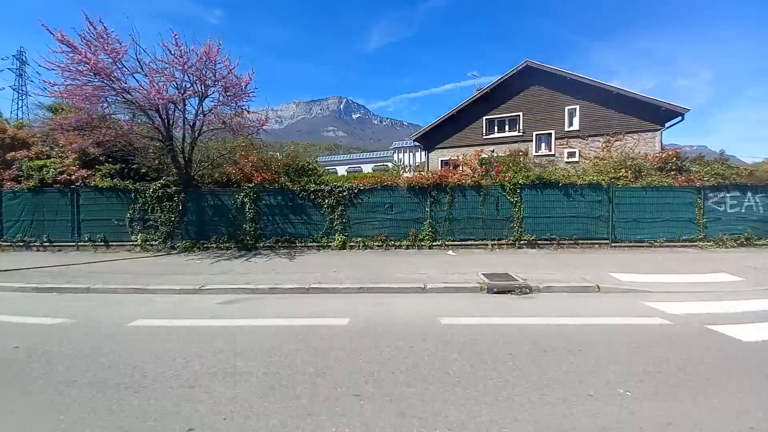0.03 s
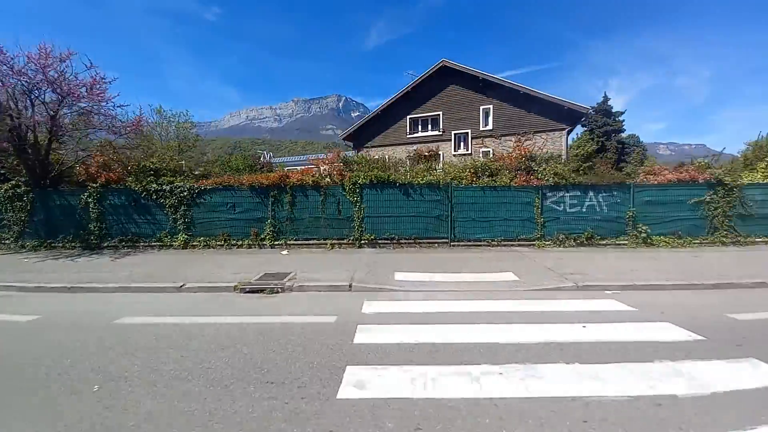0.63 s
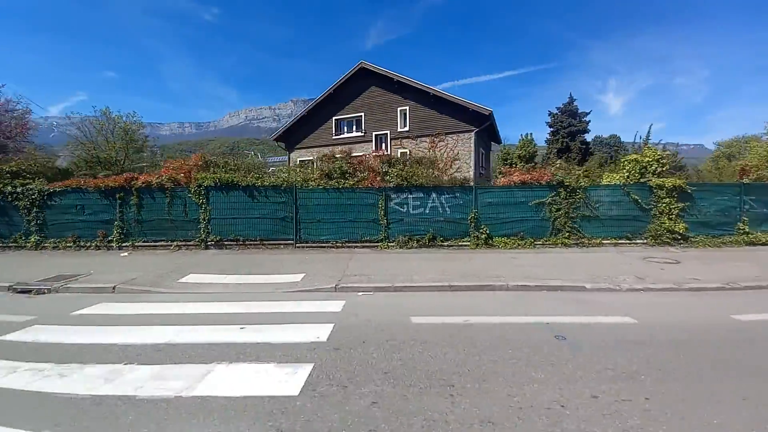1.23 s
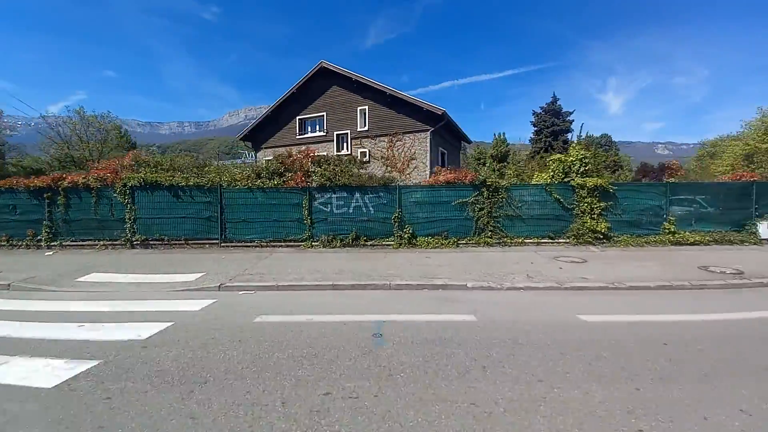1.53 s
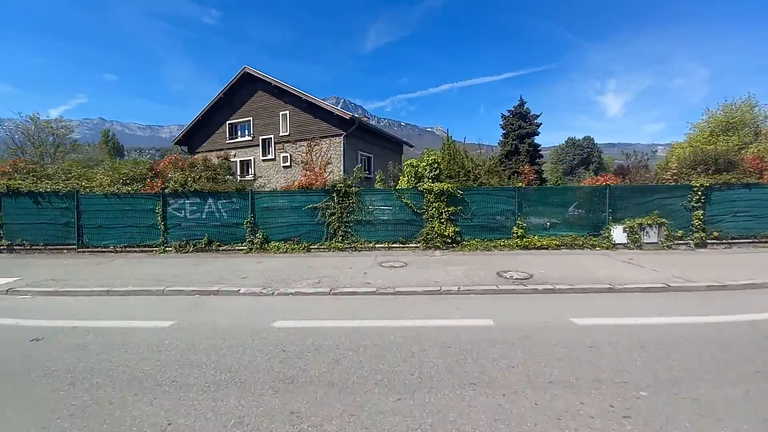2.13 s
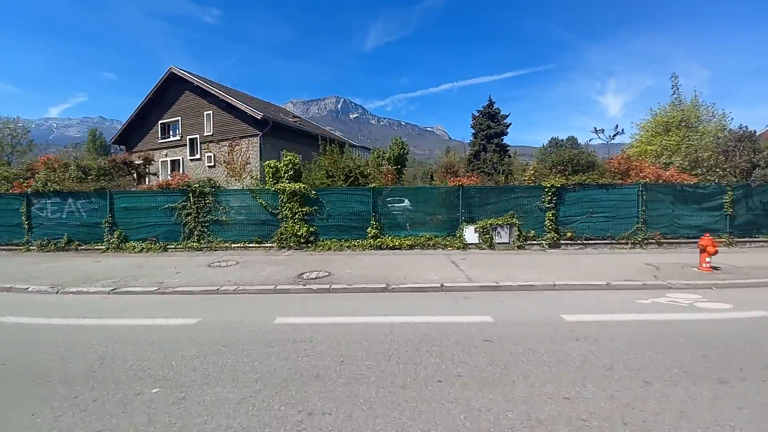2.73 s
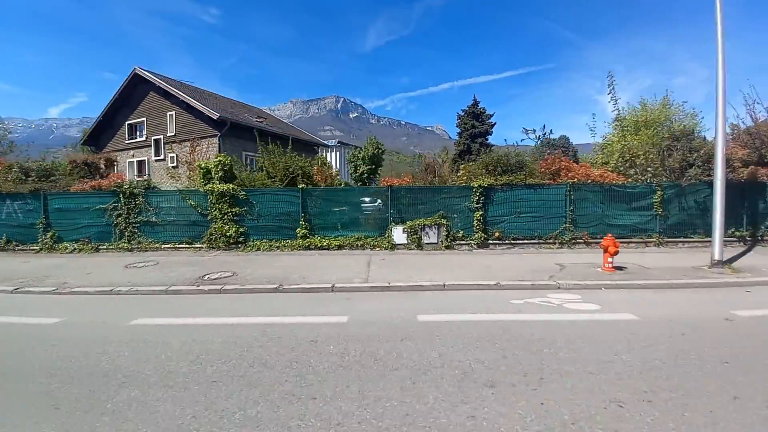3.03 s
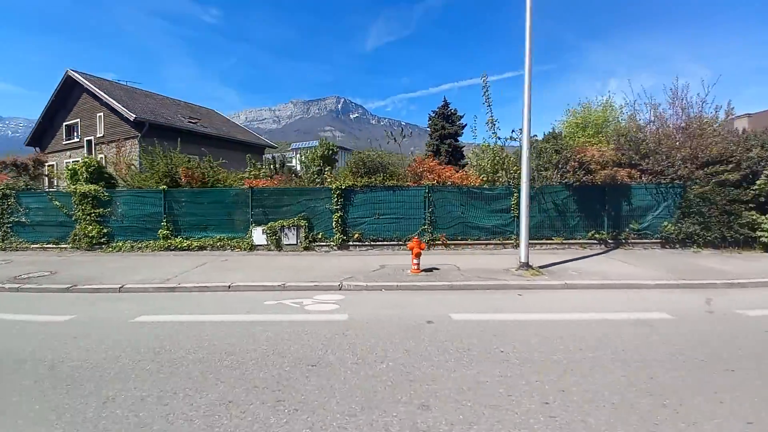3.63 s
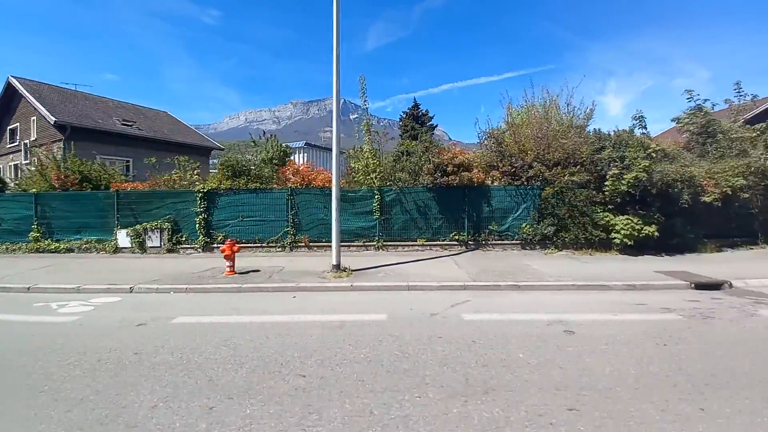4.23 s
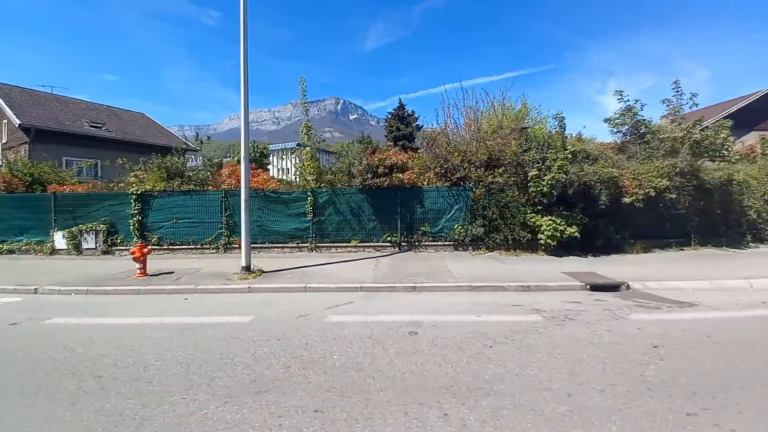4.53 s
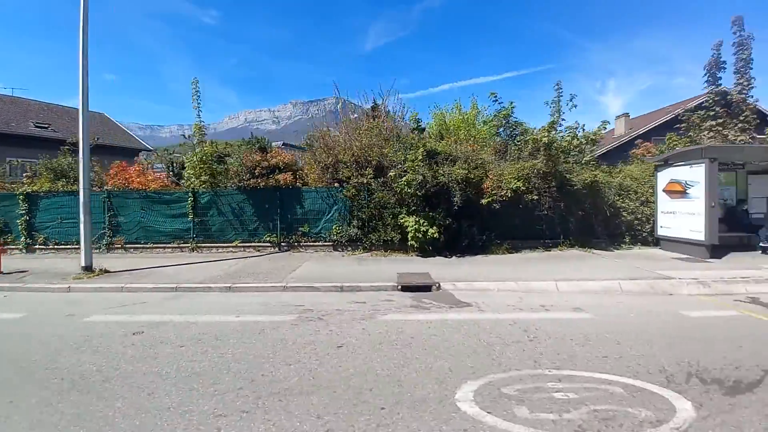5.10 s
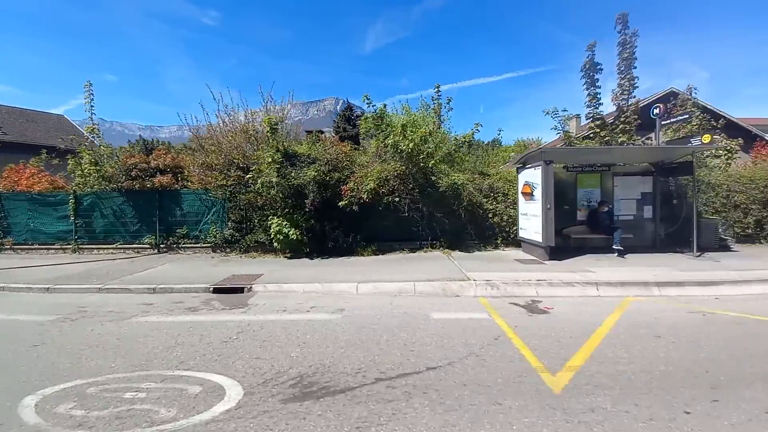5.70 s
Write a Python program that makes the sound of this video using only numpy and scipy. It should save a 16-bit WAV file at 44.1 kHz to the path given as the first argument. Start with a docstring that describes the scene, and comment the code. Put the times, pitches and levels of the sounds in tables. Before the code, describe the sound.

A bus rolls along, heard from inside: booming cabin, road noise and a soft whine, with bumps shaking loose fittings.

```python
"""Inside a rolling city bus. From the start the cabin booms, tyres roar, gears whine, a fan hums thinly
and plastic trim buzzes. Near 0.5 s, and harder near 1.4 s, rough road thumps the suspension and shakes
loose fittings; small parts tick and panels knock. More bumps follow after 3 s while the whine sinks with
the slowing bus. From about 4.3 to 4.9 s a brake pad sings on its disc. After 5.3 s the bus picks up
speed and the whine rises again."""
import sys
import numpy as np
from scipy import signal
from scipy.fft import rfft, irfft, next_fast_len
from scipy.io import wavfile
from scipy.ndimage import map_coordinates

SR = 44100
rng = np.random.default_rng(int(sys.argv[2]) if len(sys.argv) > 2 else 0)


def to_wav(sig):
    """Store sig (one row per channel, or 1-D mono) as 16-bit WAV at the path in sys.argv[1].

    Samples outside -1..1 are clipped; the rate is SR.
    """
    pcm = np.clip(np.atleast_2d(sig), -1, 1) * 32767
    pcm = np.round(pcm).astype(np.int16)
    wavfile.write(sys.argv[1], SR, pcm.T)  # frames by channels


N = 258426
BURST = SR // 2  # samples in one short, struck sound


def amp(db):
    """Turn decibels into a number to multiply by."""
    return 10 ** (np.asarray(db) / 20)


def unit(x):
    """Scale a signal to an average power of 1."""
    return x / np.sqrt(np.mean(x ** 2) + 1e-20)


def along(points, hz):
    """Read between (frequency, value) points, with octaves about evenly spaced."""
    f, values = np.transpose(points)
    return np.interp(np.log(hz + 1), np.log(f + 1), values)


def curves(rows):
    """Turn each column after the time into one value per sample."""
    times, *columns = np.transpose(rows)
    return [np.interp(np.arange(N) / SR, times, column) for column in columns]


def wobble(rate):
    """A smooth random curve through `rate` points a second."""
    return map_coordinates(rng.standard_normal(int(N * rate / SR) + 4), [np.arange(N) * rate / SR])


def filtered(x, response):
    """Multiply each frequency in x by response(frequency)."""
    n = x.shape[-1]
    padded = next_fast_len(n + 8192)
    return irfft(rfft(x, padded) * response(np.fft.rfftfreq(padded, 1 / SR)), padded)[..., :n]


def colour(spectrum, hz):
    """How strong each frequency is; it falls steeply above the last point."""
    return amp(along(spectrum, hz)) / (1 + (hz / (2 * spectrum[-1][0])) ** 4)


def steady(x, span_s):
    """Even out swells slower than span_s."""
    power = signal.fftconvolve(np.mean(x ** 2, axis=0), signal.windows.hann(int(span_s * SR)), "same")
    return unit(x / np.sqrt(np.abs(power) + 1e-9))


def place(start, burst):
    """Put a short stereo sound into silence at `start` seconds."""
    out = np.zeros((2, N + BURST))
    out[:, round(start * SR):][:, :BURST] = burst
    return out[:, :N]


# How alike left and right sound in the cabin: f/Hz, likeness (1 = the same)
LIKENESS = [(60, 0.99), (130, 1), (290, 0.87), (640, 0.65), (1400, 0.19), (3000, 0.027), (12000, 0.04)]
def rush(spectrum, size=N, lag_s=.00046):
    """Stereo cabin noise of power 1; the treble reaches the right side first."""
    spread = lambda hz: np.arccos(np.clip(along(LIKENESS, hz), -1, 1)) / 2
    shape = lambda hz: colour(spectrum, hz) * [np.cos(spread(hz)), np.sin(spread(hz))]
    mid, side = filtered(rng.standard_normal((2, size)), shape)
    lag = lambda hz: np.exp(np.pi * 1j * hz * lag_s * hz / (hz + 300) * np.array([[-1], [1]]))
    return unit(filtered(np.array([mid + side, mid - side]), lag))


def tone(hz, waver, flicker_db=3.5):
    """A wavering note; the cabin's standing waves make it drift differently on each side."""
    phase = 2 * np.pi * np.cumsum(hz * (1 + waver * wobble(40))) / SR
    sides = [amp(flicker_db * wobble(9)) * np.sin(phase + .61 * wobble(5.4)) for _ in range(2)]
    return unit(np.array(sides))


def jolt(start, length, rise_s=.018, release_s=.025):
    """The strength of one bump: it rises, holds while the wheel crosses, then dies away."""
    t = np.arange(N) / SR - start
    return np.clip(1 + t / rise_s, 0, 1) * np.exp(-np.maximum(t - length, 0) / release_s)


# Wheels meet bumps: t/s, boom level/dB, thud level/dB, length/s
BUMPS = [(0, -17.5, -37, 0.012), (0.407, -16.5, -47.5, 0.078), (0.521, -19.5, -29, .05),
         (0.673, -15, -36, 0.1), (0.8, -21.5, -35, .08), (1.306, -12, -29, 0.04), (1.371, -22, -31, .045),
         (1.513, -23, -31, 0.059), (1.625, -13, -39, 0.055), (1.835, -15.5, -50, 0.064),
         (2.081, -16.5, -49, .035), (3.132, -15, -52, 0.062), (3.273, -17.5, -46, 0.034),
         (3.409, -17, -35.5, 0.059), (3.615, -14, -47, .035), (4.666, -13, -45, 0.037),
         (4.996, -20, -49, .03), (5.478, -15.5, -42, .025)]
# The boom between bumps: t/s, level/dB
BOOM_LEVELS = [(0, -20), (.35, -25.5), (.6, -18.5), (1.1, -20.5), (2.0, -20.5), (2.9, -22), (3.3, -20),
               (4.1, -19.5), (5.3, -18), (5.86, -23)]
# How rough the road is: t/s, roughness/dB
ROUGHNESS = [(0, -1.5), (.6, 5.5), (1.1, -3), (1.5, 6.5), (2.2, -7), (3.15, -4), (3.4, 4), (3.9, 0.5),
             (5.86, -3.5)]
# Tone colours of the cabin air, the suspension and the panels: f/Hz, level/dB
BOOM_COLOUR = [(30, -63), (50, -27.5), (62, -19), (72, -4), (81, 0), (92, -0.5), (105, -18), (125, -31),
               (200, -65)]
THUD_COLOUR = [(12, -24), (25, -20), (50, 3), (65, -2.5), (100, -41.5)]
SHUDDER_COLOUR = [(85, -26.5), (112, 0), (140, 3), (155, -3), (175, -4), (200, -7.5), (300, -44.5)]
def body():
    """The road makes the cabin air boom; bumps add a deep thud and shake the panels."""
    rough_db, = curves(ROUGHNESS)
    boom_db, = curves(BOOM_LEVELS)
    bump_boom = sum(amp(db) * jolt(start, length) for start, db, _, length in BUMPS)
    bump_thud = sum(amp(db) * jolt(start, length) for start, _, db, length in BUMPS)
    # hypot adds the power of the bumps to that of plain rolling
    boom = np.hypot(amp(boom_db + 2.5 * wobble(16)), bump_boom)
    thud = np.hypot(amp(-44.5 + .82 * rough_db), bump_thud)
    shudder = np.hypot(amp(-28 + .3 * rough_db), amp(8.5) * bump_thud)
    return (boom * steady(rush(BOOM_COLOUR), span_s=.16)
            + thud * steady(rush(THUD_COLOUR), span_s=.33)
            + shudder * steady(rush(SHUDDER_COLOUR), span_s=.25))


# Rolling noise before its boost: t/s, roar level/dB, hiss level/dB
TYRE_LEVELS = [(0.0, -28.5, -52), (1.31, -29, -54), (1.47, -28.5, -49), (1.99, -30.5, -55.5),
               (5.01, -28, -53), (5.53, -29, -53.5), (5.86, -28, -52.5)]
# Tone colours of the roar and the hiss: f/Hz, level/dB
ROAR_COLOUR = [(115, -27), (190, -7), (218, 0), (255, -3), (305, -3), (350, -9), (500, -8.5), (590, -13.5),
               (850, -15.5), (1500, -21.5), (1780, -26.5), (2350, -27), (3000, -39), (5000, -65.5)]
HISS_COLOUR = [(1200, -20), (2800, 2.5), (4000, 2.5), (6800, -5.5), (7400, -17.5), (11300, -18),
               (12000, -25), (16000, -34)]
def tyres(roar_boost_db=1.02, hiss_boost_db=2.5):
    """Tyres roar through the floor while air and tread hiss."""
    roar_db, hiss_db = curves(TYRE_LEVELS)
    roar = amp(roar_db + roar_boost_db + .56 * wobble(12)) * rush(ROAR_COLOUR)
    hiss = amp(hiss_db + hiss_boost_db + .55 * wobble(31)) * rush(HISS_COLOUR)
    return roar + hiss


# How often gear teeth meet; it falls as the bus slows, then picks up: t/s, f/Hz
TOOTH_RATE = [(0, 1428), (.8, 1378), (2.8, 1290), (4.05, 1245), (4.45, 1214), (4.82, 1155), (5.05, 1150),
              (5.27, 1136), (5.58, 1182), (5.86, 1243)]
# How hard the gears work: t/s, load/dB
GEAR_LOAD = [(0, -3), (.25, 4), (.55, -4), (2.3, -3), (4.25, -1), (4.64, 1.5), (4.8, 2.5), (5.0, 3.5),
             (5.27, -3), (5.56, 1.5), (5.72, -.5), (5.86, 0)]
# Pitches at which the cabin boosts a passing note: f/Hz, width/Hz, boost/dB
CABIN_PEAKS = [(490, 6, 8), (434, 8, 4.5), (1033, 8, 6.5), (2378, 70, 13)]
# Notes of the axle, the idler gear and the shaft: multiple of the tooth rate, relative level/dB
AXLE_NOTES = [(.365, -3.5), (.372, 0)]
IDLER_NOTES = [(.724, 1), (.734, -3.5), (.747, -2.5)]
SHAFT_NOTES = [(.168, -38), (.181, -37.5), (.908, -60.5)]
def gears():
    """Gears whine at pitches that follow the speed; all but the shaft swell with the load."""
    tooth_hz, = curves(TOOTH_RATE)
    load_db, = curves(GEAR_LOAD)
    boost_db = lambda hz: sum(db / (1 + ((hz - peak) / width) ** 2) for peak, width, db in CABIN_PEAKS)
    note = lambda hz, waver: amp(boost_db(hz)) * tone(hz, waver)
    whine = lambda notes: sum(amp(db) * note(k * tooth_hz, waver=.00699) for k, db in notes)
    axle = amp(-45.5 + .3 * load_db) * whine(AXLE_NOTES)
    idler = amp(-52.5 + .65 * load_db) * whine(IDLER_NOTES)
    teeth = amp(-53 + .4 * load_db) * note(tooth_hz, waver=.0025)
    octave = amp(-66 + 1.5 * load_db) * note(2 * tooth_hz, waver=.001)
    return whine(SHAFT_NOTES) + axle + idler + teeth + octave


def fan():
    """An air fan whines faintly at one pitch, whatever the road speed."""
    return amp(-66.5) * tone(hz=2437, waver=.001)


# Tone colours of loose parts, a bright clatter and a finer jingle: f/Hz, level/dB
CLATTER_COLOUR = [(800, -25), (2800, -7), (4600, 2), (6900, -1.5), (7500, -12), (11000, -18),
                  (16000, -35.5)]
JINGLE_COLOUR = [(5000, -28), (8000, -4), (11500, -0.5), (16000, -5)]
def trim(calming_db_per_s=.5):
    """Rough road shakes plastic trim into tiny bursts of buzz, which calm as the bus slows."""
    rough_db, = curves(ROUGHNESS)
    level_db = -74 + 1.2 * rough_db - calming_db_per_s * np.arange(N) / SR
    bursts = unit(amp(4.5 * wobble(260) + 2 * wobble(25)))
    return amp(level_db) * bursts * (rush(JINGLE_COLOUR) + .8 * rush(CLATTER_COLOUR))


def contact(start, parts, rise_s=.0003, fade_s=.012):
    """One hit: grainy noise made of (tone colour, dB) parts, dying by 60 dB in fade_s."""
    t = np.arange(BURST) / SR
    grain = unit(amp(2.2 * wobble(450)[:BURST]))
    envelope = np.minimum(t / rise_s, 1) * amp(-60 * np.maximum(t - rise_s, 0) / fade_s)
    noise = sum(amp(db) * rush(spectrum, BURST) for spectrum, db in parts)
    return place(start, envelope * grain * noise)


# The notes of a struck fitting: f/Hz, relative level/dB, time to fade by 60 dB/s
FITTING_NOTES = [(1060, -7, .4), (2120, -8.5, .55), (2720, -9.5, .4), (3050, -12.5, .28), (4390, -1, 0.28),
                 (4680, -4, .3), (5530, -10, .25), (6810, -7.5, .2)]
def ring(start, db):
    """A struck fitting rings, a little differently at each blow and on each side."""
    t = np.arange(BURST) / SR
    notes = 0
    for hz, level_db, fade_s in FITTING_NOTES:
        envelope = amp(level_db + rng.normal(0, 2, (2, 1)) - 60 * t / fade_s)
        notes += envelope * np.sin(2 * np.pi * (hz * t + rng.random((2, 1))))
    return place(start, amp(db) * notes)


# Fittings shake: t/s, clatter level/dB, jingle level/dB, rise/s, fade/s
RATTLE_HITS = [(.484, -55, -55.5, .014, .25), (.566, -49.5, -57.5, .022, .35),
               (.809, -44.5, -59.5, .002, .3), (1.272, -46.5, -53.5, .001, .15),
               (1.291, -49, -55.5, .003, .4), (1.368, -34.5, -41, .002, .29),
               (1.378, -33.5, -53, .001, .15), (1.537, -48.5, -51.5, .002, .3),
               (1.560, -48.5, -56.5, .005, .7), (1.638, -53, -59, .002, .2), (1.692, -50.5, -57, .003, .25),
               (1.878, -54.5, -62.5, .005, .29), (3.359, -54, -68, .003, .29)]
# Tone colour of the duller knock in a hit: f/Hz, level/dB
KNOCK_COLOUR = [(400, -17.5), (1100, 7.5), (1600, -3), (2100, 3.5), (2700, -5.5), (3500, -8), (6000, -33.5)]
def rattles():
    """Loose fittings clatter, knock and jingle, and each blow leaves them ringing."""
    out = np.zeros((2, N))
    for start, db, jingle_db, rise_s, fade_s in RATTLE_HITS:
        parts = [(CLATTER_COLOUR, db), (KNOCK_COLOUR, db - 2.5), (JINGLE_COLOUR, jingle_db)]
        out += contact(start, parts, rise_s, fade_s) + ring(start, db - 9)
    return out


# Small parts touch: t/s, level/dB
TICK_HITS = [(1.033, -59.5), (1.311, -41), (1.321, -43), (1.417, -41), (1.511, -42.5), (1.525, -42),
             (1.945, -58), (2.064, -57), (2.662, -58), (2.85, -59), (3.361, -52)]
def ticks():
    """Small hard parts tick: a very short jingle over a softer clatter and knock."""
    return sum(contact(start, [(CLATTER_COLOUR, db - 7), (KNOCK_COLOUR, db - 8), (JINGLE_COLOUR, db)])
               for start, db in TICK_HITS)


# Panels knock: t/s, level/dB, f/Hz, fade/s, snap level/dB
PANEL_HITS = [(1.273, -29.5, 2090, .09, -36), (1.464, -28.5, 1100, .14, -60),
              (1.537, -35.5, 3100, .05, -36), (3.95, -39, 1500, .13, -62)]
# Tone colour of a panel: multiple of its pitch, level/dB
PANEL_COLOUR = [(.25, -26), (.55, -8), (.78, -10.5), (1, 0), (1.25, -12), (2.2, -18.5), (3.5, -34),
                (6, -50)]
def panel_knocks():
    """Each body panel knocks at its own pitch, with a short snap as it makes contact."""
    out = np.zeros((2, N))
    for start, db, hz, fade_s, snap_db in PANEL_HITS:
        spectrum = [(k * hz, level_db) for k, level_db in PANEL_COLOUR]
        out += contact(start, [(spectrum, db)], fade_s=fade_s)
        out += contact(start, [(CLATTER_COLOUR, snap_db)])
    return out


# The brake's two squeals: t/s, high squeal level/dB, low squeal level/dB
SQUEAL_LEVELS = [(4.2, -110, -110), (4.35, -76, -76), (4.43, -77, -65), (4.56, -76, -66), (4.72, -71, -78),
                 (4.82, -76, -78), (4.88, -73.5, -80), (4.94, -86, -92), (5.05, -110, -110)]
def brake(high_hz=15350, width_hz=70, low_hz=6220):
    """A pad rubs the disc: a pure low squeal gives way to a breathy high one."""
    high_db, low_db = curves(SQUEAL_LEVELS)
    narrow_band = lambda hz: 1 / (1 + 1j * (hz - high_hz) / width_hz)
    high = unit(filtered(rng.standard_normal((2, N)), narrow_band))
    low = tone(low_hz, waver=.0044, flicker_db=4)
    return amp(high_db) * high + amp(low_db) * low


# How much louder the left side is than the right: f/Hz, level/dB
LEFT_OVER_RIGHT = [(60, 1), (110, 0.55), (200, 2.5), (380, -2.1), (700, 0.5), (1300, -1), (8000, -1)]
def scene():
    """Everything heard from a window seat."""
    rolling = body() + tyres() + gears() + fan() + trim()
    events = rattles() + ticks() + panel_knocks() + brake()
    balance = lambda hz: amp(along(LEFT_OVER_RIGHT, hz) * np.array([[.5], [-.5]]))
    return filtered(rolling + events, balance)


def record(dry, fade_in_s=.006, top_hz=15800):
    """Start the sound softly and cut off the very highest treble."""
    fade_in = np.minimum(np.arange(N) / (fade_in_s * SR), 1)
    return filtered(dry * fade_in, lambda hz: hz < top_hz)


dry = scene()
out = record(dry)
to_wav(out)
```